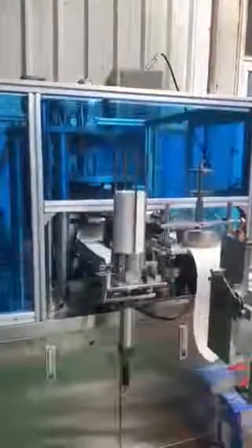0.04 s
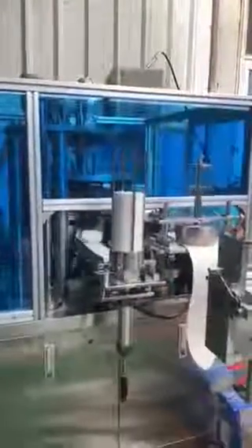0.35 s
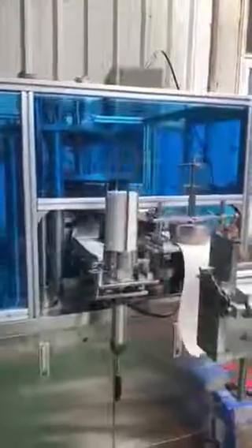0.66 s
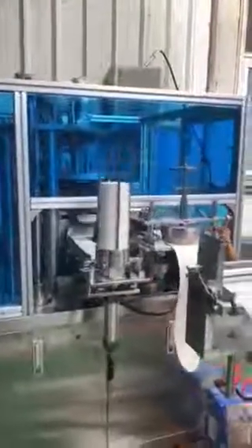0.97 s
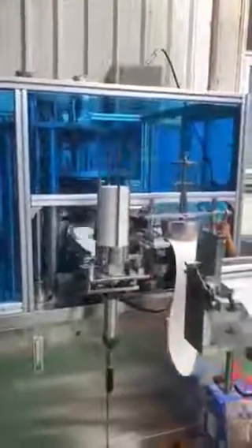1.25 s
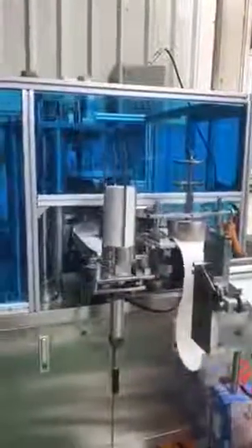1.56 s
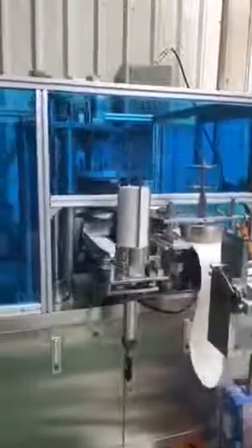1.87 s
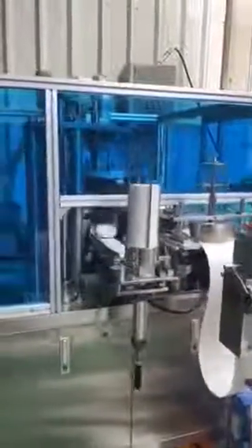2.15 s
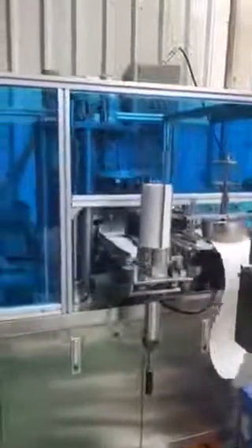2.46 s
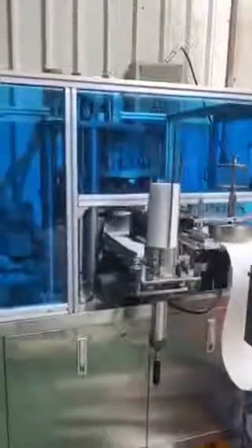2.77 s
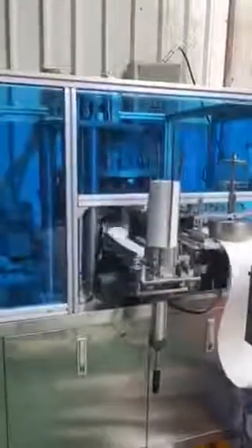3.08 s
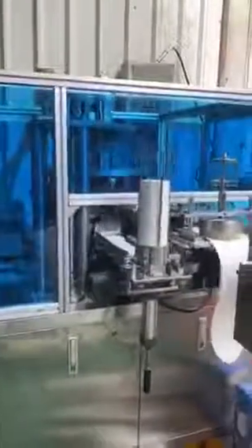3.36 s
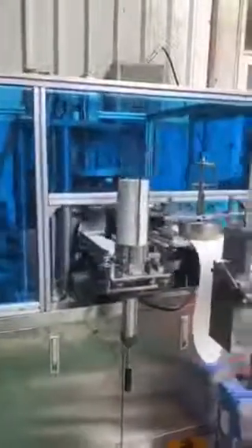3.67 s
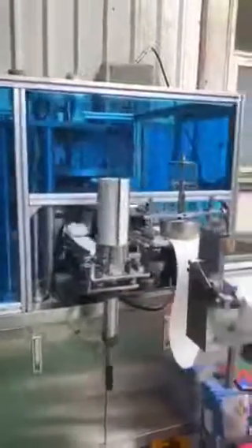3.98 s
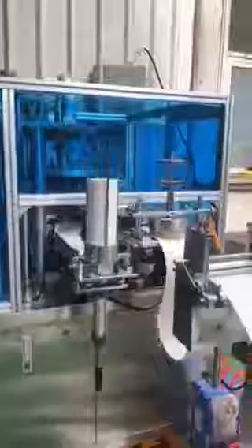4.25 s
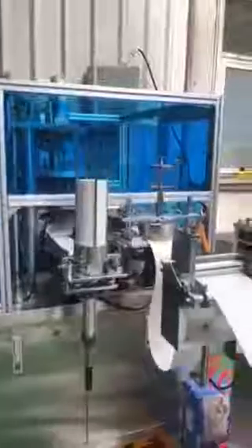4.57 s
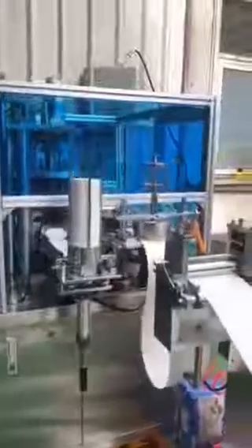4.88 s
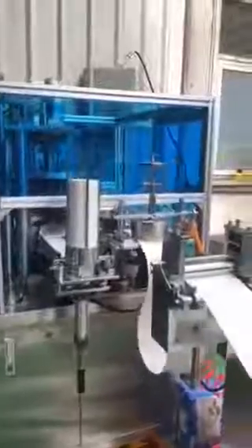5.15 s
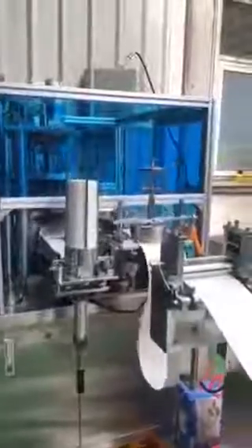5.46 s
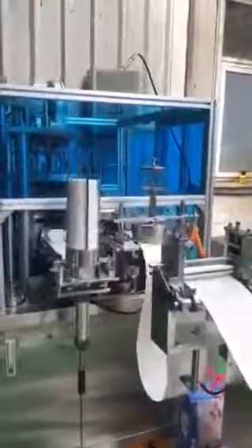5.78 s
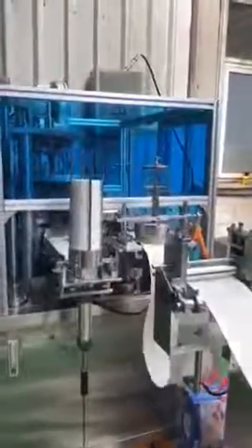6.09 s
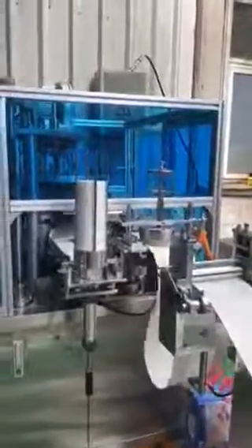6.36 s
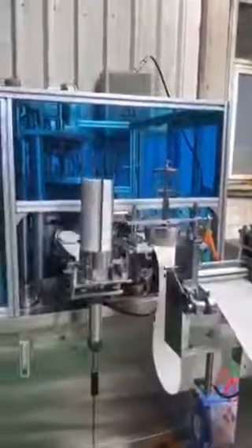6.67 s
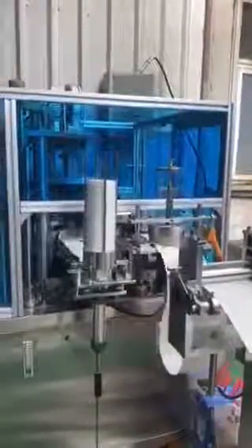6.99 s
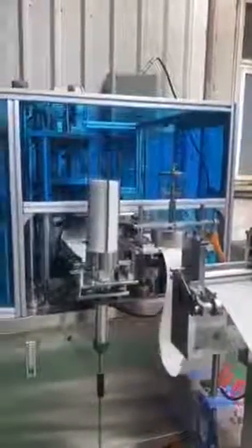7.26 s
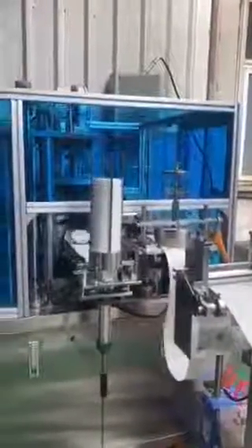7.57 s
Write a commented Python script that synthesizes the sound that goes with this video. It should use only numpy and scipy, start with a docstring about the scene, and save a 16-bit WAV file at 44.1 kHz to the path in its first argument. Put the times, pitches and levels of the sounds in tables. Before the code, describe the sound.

An industrial paper-forming machine runs close by from start to finish, for nearly eight seconds, repeating its cycle about every 0.9 seconds. Each stroke opens with low thumps and knocks in the frame, a crunch as the die cuts paper and a blow from the press, followed by a sharp steel ejector clack. The clacks fall at about 0.3, 1.2, 2.1 and 3.1 seconds and continue at that pace. Other metal strikes clatter between them, and brief steel rings linger near 0.3, 2.1, 3.1, 6.7 and 7.6 seconds. Underneath, motors drone and a high air hiss throbs quickly, both swelling with each stroke. A feed roller squeaks faintly about every 0.4 seconds. The sound dips for an instant with a tiny blip near 1.8 and 2.7 seconds. The workshop's metal walls add a short echo.

```python
"""Paper lid forming machine.

In a sheet-metal workshop, about every 0.9 s, cams thump the frame, the die crunches through paper,
the press lands and a steel ejector clacks; hard hits ring the tooling. Motors drone and air hisses,
swelling with the load. A roller makes the hiss throb and squeaks once a turn. The sound dips twice."""
import sys
import numpy as np
from scipy import signal
from scipy.fft import rfft, irfft, next_fast_len
from scipy.io import wavfile

SR = 44100
rng = np.random.default_rng(int(sys.argv[2]) if len(sys.argv) > 2 else 0)


def generate_wav(sig):
    """Save sig (samples, or channels by samples) to the path in sys.argv[1] as 16-bit PCM at SR."""
    pcm = np.round(np.clip(np.atleast_2d(sig).T, -1, 1) * 32767).astype(np.int16)
    wavfile.write(sys.argv[1], SR, pcm)


N = 340893
TIME_S = np.arange(N) / SR


def from_db(db):
    """Decibels to gain."""
    return 10 ** (np.asarray(db) / 20)


def unit_rms(x):
    """Scale to rms 1."""
    return x / np.sqrt(np.mean(x ** 2) + 1e-20)


def drift(rate_hz):
    """Smooth random wander, rms 1."""
    step, settle = 40, 2000
    r = np.exp(-2 * np.pi * rate_hz * step / SR)
    white = rng.standard_normal(N // step + settle + 2)
    slow = signal.lfilter([1], [1, -2 * r, r * r], white)[settle:]
    return np.interp(np.arange(N) / step, np.arange(len(slow)), unit_rms(slow))


def coloured(x, spectrum):
    """Apply a smooth spectrum; white noise keeps its power."""
    hz, db = np.transpose(spectrum)
    size = next_fast_len(len(x) + SR // 10)
    grid_hz = np.maximum(np.fft.rfftfreq(size, 1 / SR), 1)
    gain = unit_rms(from_db(np.interp(np.log(grid_hz), np.log(hz), db)))
    return irfft(rfft(x, size) * gain, size)[:len(x)]


def resonate(x, modes):
    """Parallel resonators of alternating sign; white noise keeps its power."""
    out, power = 0, 0
    for k, (hz, width_hz, db) in enumerate(modes):
        r = np.exp(-np.pi * width_hz / SR)
        b = (1 - r * r) / 2
        poles = [1, -2 * r * np.cos(2 * np.pi * hz / SR), r * r]
        out = out + (-1) ** k * from_db(db) * signal.lfilter([b, 0, -b], poles, x + 1e-18)
        power += from_db(db) ** 2 * b
    return out / np.sqrt(power)


def add(out, start_s, sound):
    """Mix a sound in at start_s."""
    at = round(start_s * SR)
    first, last = max(at, 0), min(at + len(sound), N)
    if last > first:
        out[first:last] += sound[first - at:last - at]


def swell(rise_s, t60_s):
    """Envelope that rises, then dies away."""
    t = np.arange(int((rise_s + t60_s) * SR)) / SR
    attack = np.sin(np.pi / 2 * np.minimum(t / rise_s, 1))
    return attack * from_db(-60 * np.maximum(t - rise_s, 0) / t60_s)


def tone(hz, db, envelope):
    """Sine under an envelope."""
    return from_db(db) * envelope * np.sin(2 * np.pi * hz * np.arange(len(envelope)) / SR)


def force(contacts, rise_s, t60_s):
    """Envelope of overlapping contacts, summed in power."""
    power, shape = np.zeros(N), swell(rise_s, t60_s)
    for peak_s, db in contacts:
        add(power, peak_s - rise_s, (from_db(db) * shape) ** 2)
    return np.sqrt(power)


def scrape(hz, width_hz):
    """Narrow band of friction noise around a pitch, rms 1."""
    rough_hz = hz + width_hz * drift(201.2) / 2
    return unit_rms(drift(width_hz / 2) * np.sin(2 * np.pi * np.cumsum(rough_hz) / SR))


# Strength of successive camshaft strokes: (force [dB], ejector [dB], stop ring [dB])
STROKES = [(0.5, -2, 2), (-1.7, -1.5, -21), (-1.8, -4.5, 2), (-2, -4, 1.5), (-1.2, -5, -6), (-2.5, 1, -3),
           (-1.5, 2, -6), (-1.3, -1, -6), (-0.9, 0, -4)]
FORCE_DB, EJECTOR_DB, STOP_DB = np.transpose(STROKES)
FIRST_STROKE_S, STROKE_S = -.155, .914
STROKE_STARTS_S = FIRST_STROKE_S + STROKE_S * np.arange(len(STROKES))

def every_stroke(contacts, stroke_db=FORCE_DB):
    """Repeat contacts at their delays in each stroke, scaled by its strength."""
    return [(start_s + delay_s, level_db + db)
            for start_s, db in zip(STROKE_STARTS_S, stroke_db) for delay_s, level_db in contacts]


def chatter(repeat_share, grain_db):
    """Stream of tiny impacts; the cams replay part of the pattern on every stroke."""
    repeated, pattern = np.zeros(N), rng.standard_normal(int(STROKE_S * SR))
    for start_s in STROKE_STARTS_S:
        add(repeated, start_s, pattern)
    impacts = np.sqrt(repeat_share) * repeated + np.sqrt(1 - repeat_share) * rng.standard_normal(N)
    return unit_rms(impacts * from_db(grain_db * drift(530)))


def load():
    """Drive load: 0 idling, 1 with the die closed."""
    delay_s = (TIME_S - FIRST_STROKE_S) % STROKE_S
    return np.interp(delay_s, [.0044, .23, .68], [0, 1, 0])


# Drone spectrum: (frequency [Hz], gain [dB])
DRONE_SPECTRUM = [(12, -62), (20, -44), (42, -14.5), (69, -11), (90, -1), (123, -9.5), (154, -2.5),
                  (205, -6), (224, -5), (256, -5), (426, -11), (906, -12), (1130, -15.5), (1900, -18.5),
                  (2500, -22.5), (3900, -28), (5200, -41), (8800, -120)]
# Motor resonances: (frequency [Hz], width [Hz], gain [dB])
MOTOR_MODES = [(56.2, 4.2, 7.5), (98.5, 16, 9), (159.2, 6.1, 15), (712, 21, -1.5), (1043, 77, -2.5)]

def motors():
    """Motors and bearings drone, swelling with the load, over a steady hum."""
    rough = rng.standard_normal(N) * unit_rms(from_db(1.5 * drift(135)))
    drone = from_db(-28.5 + 2 * load()) * coloured(rough, DRONE_SPECTRUM)
    hum = from_db(-34) * resonate(rng.standard_normal(N), MOTOR_MODES)
    return drone + hum


TURN_S, FIRST_THROB_S = .4005, .212

def throb_db():
    """Swing of the hiss: three throbs and one wobble per roller turn."""
    angle = 2 * np.pi * (TIME_S - FIRST_THROB_S) / TURN_S
    return 1.47 * np.cos(3 * angle) + .65 * np.cos(angle)


# Hiss spectrum: (frequency [Hz], gain [dB])
AIR_SPECTRUM = [(1500, -47), (3000, -17), (4350, -8.5), (5100, 1), (6100, 2), (8500, -3), (10000, 2),
                (12000, -2), (14000, -18)]

def air(fade_db_per_s=.18):
    """Air hisses, swelling with the load and throbbing with the roller."""
    gust_db = .8 * drift(17)
    level_db = -37 + 3.5 * load() + throb_db() + gust_db - fade_db_per_s * TIME_S
    rough = rng.standard_normal(N) * unit_rms(from_db(.39 * drift(370)))
    return from_db(level_db) * coloured(rough, AIR_SPECTRUM)


def roller_rub():
    """The feed roller rubs the web on each throb; its pitch wanders with the grip."""
    level_db = -48 + 2.5 * throb_db() + 3 * drift(5.9)
    return from_db(level_db) * scrape(5070 + 202 * drift(9.7), width_hz=200)


# Shimmer spectrum: (frequency [Hz], gain [dB])
GRAIN_SPECTRUM = [(1500, -9.5), (1850, 0.5), (2170, 4), (2500, 0), (2750, 1.5), (3170, -2), (3400, -1.5),
                  (3650, -4), (4400, -4), (4900, -2), (5400, -3), (6100, -6)]

def ringing_grains(crunch, clack, rate_per_s=480, spread_db=8):
    """A dense, swirly shimmer of short random tones at 1.5-6 kHz, loudest during crunches and clacks."""
    out, shape = np.zeros(N), swell(rise_s=.0066, t60_s=.13)
    level = from_db(-38) + from_db(-11) * crunch + from_db(-12) * clack
    grid_hz, gain_db = np.transpose(GRAIN_SPECTRUM)
    for when, pitch, weakness in rng.random((int(rate_per_s * N / SR), 3)):
        hz = grid_hz[0] + pitch * (grid_hz[-1] - grid_hz[0])
        db = np.interp(hz, grid_hz, gain_db) - spread_db * weakness
        add(out, when * N / SR, level[int(when * N)] * tone(hz, db, shape))
    return out


# Cam loads on the base: (delay [s], level [dB])
CAM_THUMPS = [(.058, -24.5), (.100, -22.5), (.29, -35), (.482, -27), (.519, -29)]
# Response of the base: (frequency [Hz], gain [dB])
BASE_SPECTRUM = [(20, -18), (40, -21), (65, -1), (110, 1), (170, 2.5), (280, -1.5), (420, -7.5),
                 (700, -12.5), (2000, -33.5)]

def cams():
    """Cams thump the base, which also rumbles with the load."""
    thump = force(every_stroke(CAM_THUMPS), rise_s=.041, t60_s=.19)
    rumble = from_db(-41 + 12 * load())
    return coloured(np.hypot(thump, rumble) * chatter(repeat_share=.84, grain_db=-.5), BASE_SPECTRUM)


# Lever and plate knocks in each stroke: (delay [s], frequency [Hz], peak [dB])
KNOCKS = [(.059, 85, -20.5), (.054, 159, -27.5), (.079, 264, -30), (.110, 326, -19.5), (.144, 191, -16),
          (.153, 286.6, -24.5), (.147, 375, -23), (.147, 520, -22.5), (.234, 669, -23.5), (.25, 101, -30),
          (.403, 163.3, -16), (.495, 163, -21)]
# Single jolts of feed and frame: (time [s], frequency [Hz], peak [dB])
JOLTS = [(.008, 216, -14.5), (.049, 334, -19.5), (.123, 98, -21), (.2, 265, -20), (.334, 136, -21),
         (.366, 174, -21), (.835, 159, -13.5), (0.864, 98, -26), (1.007, 72, -24), (1.766, 154, -19),
         (1.775, 76, -23), (2.05, 160, -19), (2.641, 176, -18), (2.68, 93, -18), (2.733, 174, -22),
         (2.754, 311, -23), (2.839, 92, -22), (2.885, 101, -21), (3.072, 95, -20), (3.798, 97, -22),
         (3.959, 99, -21), (3.982, 275, -21), (4.47, 74, -24), (4.514, 101, -20), (4.568, 258, -24),
         (4.601, 166, -23), (5.387, 92.5, -24), (5.482, 276, -28), (5.544, 177, -30), (5.812, 100, -18),
         (6.368, 93.5, -28), (6.545, 80, -24), (6.752, 161, -23), (6.39, 473, -23), (7.427, 271, -20.5),
         (7.487, 165, -19), (7.614, 165, -20), (7.638, 81, -21), (7.682, 305, -19)]

def knocks(rise_s=.01178, scatter_db=.7, detune=.035):
    """Heavy parts ring for a few cycles, a little differently each stroke."""
    out, shape = np.zeros(N), swell(rise_s, t60_s=.072)
    for start_s, force_db in zip(STROKE_STARTS_S, FORCE_DB):
        for delay_s, hz, peak_db in KNOCKS:
            pitch_hz = hz * (1 + detune * rng.standard_normal())
            db = peak_db + force_db + scatter_db * rng.standard_normal()
            add(out, start_s + delay_s - rise_s, tone(pitch_hz, db, shape))
    for peak_s, hz, db in JOLTS:
        add(out, peak_s - rise_s, tone(hz, db, shape))
    return out


# Bites of the punch through the web: (delay [s], crunch [dB], snap [dB])
BITES = [(0.08, -23.5, -28.5), (0.1, -25.5, -28.5), (.129, -25, -33)]
# Creases as the rim folds and the web is drawn on: (delay [s], level [dB])
FOLDS = [(.231, -32.5), (.912, -37)]

def cutting_forces():
    """Snap and crunch envelopes: the punch breaks through in three bites, then the paper creases."""
    delay_s, crunch_db, snap_db = np.transpose(BITES)
    snap = force(every_stroke(list(zip(delay_s, snap_db))), rise_s=.002, t60_s=.21)
    bite = force(every_stroke(list(zip(delay_s, crunch_db))), rise_s=.0051, t60_s=.3)
    fold = force(every_stroke(FOLDS), rise_s=.021, t60_s=.95)
    return snap, np.hypot(bite, fold)


# Punch resonances: (frequency [Hz], width [Hz], gain [dB])
PUNCH_MODES = [(2380, 480, 15), (3160, 1100, 9.5), (4300, 600, -16), (5460, 960, 6)]

def punch(snap):
    """The punch resonates as it snaps through the web."""
    return resonate(snap * chatter(repeat_share=.058, grain_db=-5.5), PUNCH_MODES)


# Crunch spectrum: (frequency [Hz], gain [dB])
PAPER_SPECTRUM = [(300, 14), (900, -11), (1600, 5.5), (2500, -4.5), (3300, -1), (4300, 4), (5600, -0.5),
                  (8500, -1.5), (12000, -1), (14000, -22)]

def paper(crunch):
    """Paper crunches as it is cut and creased."""
    return coloured(crunch * chatter(repeat_share=.04, grain_db=1.7), PAPER_SPECTRUM)


# Press landing and lifting: (delay [s], level [dB])
BLOWS = [(.106, -28.5), (.143, -21), (.187, -28.5), (.231, -25.5)]
# Guard shudders as the ejector goes out and returns: (delay [s], level [dB])
SHUDDERS = [(.471, -29), (.67, -32.5)]
# Response of the guards: (frequency [Hz], gain [dB])
GUARD_SPECTRUM = [(150, -12), (300, 10.5), (550, 7.5), (800, -6), (1100, 2), (1700, 4), (2600, -8.5),
                  (5000, -19), (12000, -67)]
# Die resonances: (frequency [Hz], width [Hz], gain [dB])
DIE_MODES = [(806, 130, 4), (1560, 100, -3.5), (2600, 62, -17), (3435, 77, 2)]

def press():
    """Press blows and ejector travel shake the guards and ring the die."""
    blow = force(every_stroke(BLOWS), rise_s=.0072, t60_s=.13)
    shudder = force(every_stroke(SHUDDERS), rise_s=.036, t60_s=.38)
    impacts = np.hypot(blow, shudder) * chatter(repeat_share=.68, grain_db=-3.5)
    return coloured(impacts, GUARD_SPECTRUM) + from_db(-4.5) * resonate(impacts, DIE_MODES)


# Steel-on-steel strikes of punch, die and ejector: (time [s], body [dB], treble [dB])
STRIKES = [(.033, -34, -20), (.315, -20.5, -22), (.335, -29, -22), (.379, -25, -33), (.837, -35, -27),
           (0.858, -42, -23), (.886, -26, -17), (1.011, -23, -26), (1.231, -22.5, -38), (1.75, -37, -21),
           (1.777, -30, -29), (1.804, -24, -25), (1.823, -23, -26), (1.919, -32, -28), (2.139, -25, -17),
           (2.665, -34, -29), (2.674, -26, -31), (2.817, -29, -17), (2.826, -25, -19), (3.053, -22, -17),
           (3.575, -24, -19), (3.598, -39, -24), (3.627, -23, -16), (3.741, -20, -18), (3.927, -27, -27),
           (3.965, -25, -26), (4.491, -23, -17), (4.517, -26, -20), (4.546, -20, -26), (4.644, -22.5, -19),
           (4.883, -29, -28), (5.408, -25, -15.5), (5.428, -27, -25), (5.457, -21, -18),
           (5.558, -30, -18.5), (5.796, -29, -34), (5.855, -25, -34), (6.318, -29, -32), (6.339, -26, -25),
           (6.378, -26, -33), (6.472, -33, -25), (6.711, -26, -22), (6.744, -25, -30), (7.232, -31, -27),
           (7.259, -29, -30), (7.284, -29, -29), (7.388, -24, -33), (7.624, -17.5, -30)]
# Tooling modes: (frequency [Hz], gain [dB])
TOOLING_MODES = [(905, -8.5), (1200, -10.5), (1320, -13), (1620, -12.5), (1900, -21), (2160, -14),
                 (2480, -19), (2770, -19.5), (3290, -13), (3800, -23), (4210, -19), (4570, -19),
                 (5090, -17), (5560, -16.5)]

def strikes(body_hz=2200, treble_hz=4280, scatter_db=3.5, detune=.022):
    """Each strike cracks and rings the tooling, every mode at its own strength."""
    out = np.zeros(N)
    hz, mode_db = np.transpose(TOOLING_MODES)
    ring, crack = swell(rise_s=.003, t60_s=.11), swell(rise_s=.003, t60_s=.028)
    t = np.arange(len(ring)) / SR
    band = signal.butter(2, [900, 6000], "band", fs=SR, output="sos")
    for start_s, body_db, treble_db in STRIKES:
        tilt_db = np.interp(hz, [body_hz, treble_hz], [body_db, treble_db])
        db = mode_db + tilt_db + scatter_db * rng.standard_normal(len(hz))
        pitch_hz = hz * (1 + detune * rng.standard_normal(len(hz)))
        modes = np.sin(2 * np.pi * (pitch_hz[:, None] * t + rng.random((len(hz), 1))))
        add(out, start_s, ring * (from_db(db) @ modes))
        noise = unit_rms(signal.sosfilt(band, rng.standard_normal(SR // 10)))
        add(out, start_s, from_db(body_db - 6) * crack * noise[:len(crack)])
    return out


# Roller slip on successive turns: (level [dB])
SLIPS_DB = [-36, -39, -42, -40, -36, -38, -42, -37, -44, -35, -42, -38, -39, -41, -40, -43, -42, -41, -40]

def roller_squeaks(lead_s=.05, rise_s=.058, hold_s=.027, release_s=.025, slide_s=.045):
    """The roller slips once a turn: a falling scrape with a thin whistle above it."""
    turn, since_s = np.divmod(TIME_S - FIRST_THROB_S + lead_s, TURN_S)
    grip = np.interp(since_s, np.cumsum([0, rise_s, hold_s, release_s]), [0, 1, 1, 0])
    level = grip * from_db(np.take(SLIPS_DB, turn.astype(int), mode="clip"))
    pitch_hz = np.interp(since_s, [0, slide_s], [6100, 5120])
    whistle = from_db(-8) * grip * scrape(11800, width_hz=400)
    return level * (scrape(pitch_hz, width_hz=160) + whistle)


# Ejector meeting its stop: (delay [s], level [dB])
CLACKS = [(.470, -23)]
# Lid snagging in the ejector: (time [s], level [dB])
SNAGS = [(3.931, -22)]

def ejector_force():
    """Clack envelope: one hit on the stop per stroke, plus a snagged lid."""
    return force(every_stroke(CLACKS, EJECTOR_DB) + SNAGS, rise_s=.007, t60_s=.17)


# Ejector resonances: (frequency [Hz], width [Hz], gain [dB])
EJECTOR_MODES = [(740, 390, -1), (1170, 140, -6), (1320, 49, 3), (1600, 630, -4), (2240, 340, -10),
                 (2700, 54, -10), (3420, 190, -19), (4525, 77, -1), (5760, 3200, -19)]

def ejector(clack):
    """The steel ejector resonates under each clack."""
    return resonate(clack * chatter(repeat_share=.4, grain_db=2.5), EJECTOR_MODES)


# Clink of the stop: (delay [s], level [dB])
CLINKS = [(.473, -29)]
# Stop modes: (frequency [Hz], gain [dB])
STOP_MODES = [(2765, -1), (4210, -4), (4570, -3), (4615, -2), (5090, -8)]

def ejector_stop():
    """The steel stop rings when the ejector hits it."""
    clink = force(every_stroke(CLINKS, STOP_DB), rise_s=.0027, t60_s=.16)
    modes = sum(from_db(db) * np.sin(2 * np.pi * (hz * TIME_S + rng.random())) for hz, db in STOP_MODES)
    return clink * unit_rms(modes)


# Lingering steel tones: (time [s], frequency [Hz], peak [dB])
RINGS = [(.32, 1253, -30), (2.145, 4198, -37), (3.06, 946, -32), (6.714, 1024, -33), (7.63, 1130, -28)]

def steel_rings():
    """After some clacks a single steel part rings on."""
    out, shape = np.zeros(N), swell(rise_s=.0027, t60_s=.33)
    for start_s, hz, db in RINGS:
        add(out, start_s, tone(hz, db, shape))
    return out


def workshop(x, t60_s=.55, predelay_s=.015):
    """Diffuse tail from the metal walls, duller than the direct sound."""
    t = np.arange(SR) / SR
    tail = rng.standard_normal(SR) * from_db(-60 * t / t60_s) * (t > predelay_s)
    lowpass = signal.butter(1, 7000, fs=SR, output="sos")
    tail = signal.sosfilt(lowpass, tail / np.sqrt(np.sum(tail ** 2)))
    return signal.fftconvolve(x, tail)[:N]


# Brief level dips: (time [s], length [s], depth [dB], low edge [Hz], high edge [Hz])
DIPS = [(1.767, .02, -26, 600, 11000), (2.7185, .02, -36, 15, 8000)]
# Blips in the dips: (time [s], frequency [Hz], peak [dB])
BLIPS = [(1.764, 3600, -24), (1.772, 1650, -25), (1.776, 2000, -24), (1.774, 5300, -25), (2.714, 2510, -20),
         (2.7153, 3280, -18.5), (2.719, 1920, -17), (2.7224, 940, -20), (2.723, 4150, -26),
         (2.723, 4900, -26)]

def dips(x, edge_s=.002, blip_s=.012):
    """The sound sinks twice for an instant, with a few short blips in each gap."""
    out = x.copy()
    for centre_s, length_s, depth_db, low_hz, high_hz in DIPS:
        inside = np.clip((length_s / 2 - np.abs(TIME_S - centre_s)) / edge_s + .5, 0, 1)
        band = signal.butter(2, [low_hz, high_hz], "band", fs=SR, output="sos")
        out -= inside * (1 - from_db(depth_db)) * signal.sosfiltfilt(band, x)
    shape = np.hanning(int(blip_s * SR))
    for centre_s, hz, db in BLIPS:
        add(out[0], centre_s - blip_s / 2, tone(hz, db, shape))
    return out


def scene():
    """The machine in its workshop, over motors, air and roller; mono."""
    snap, crunch = cutting_forces()
    clack = ejector_force()
    machine = ringing_grains(crunch, clack) + cams() + knocks() + punch(snap) + paper(crunch) + press()
    machine += strikes() + ejector(clack) + ejector_stop() + steel_rings()
    background = motors() + air() + roller_rub() + roller_squeaks()
    return (machine + from_db(-6) * workshop(machine) + background)[None]


def record(dry):
    """Two dips, a hollow around 7.4 kHz and a top cut at 12.7 kHz."""
    hollow = signal.butter(7, [6450, 8220], "bandstop", fs=SR, output="sos")
    top_cut = signal.ellip(10, .3, 90, 12700, fs=SR, output="sos")
    return signal.sosfilt(top_cut, signal.sosfilt(hollow, dips(dry)))


dry = scene()
out = record(dry)
generate_wav(out)
```